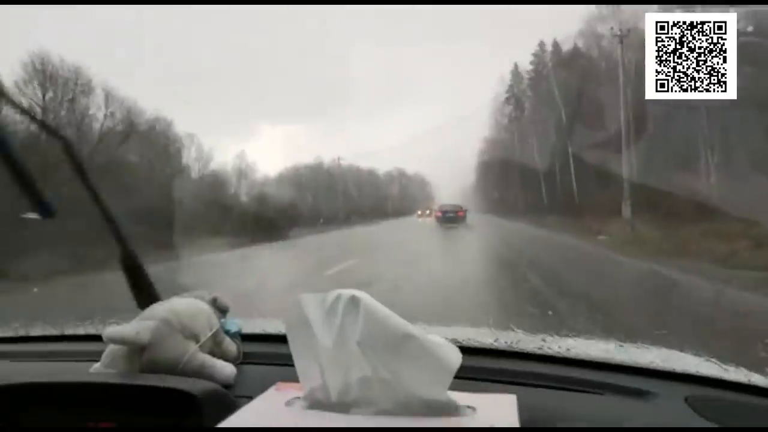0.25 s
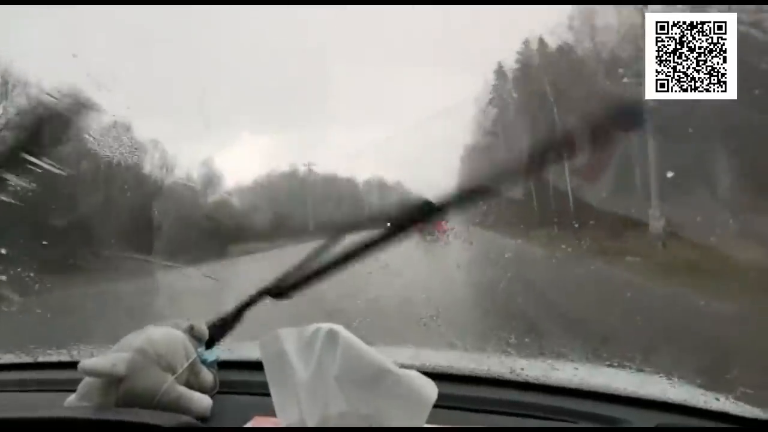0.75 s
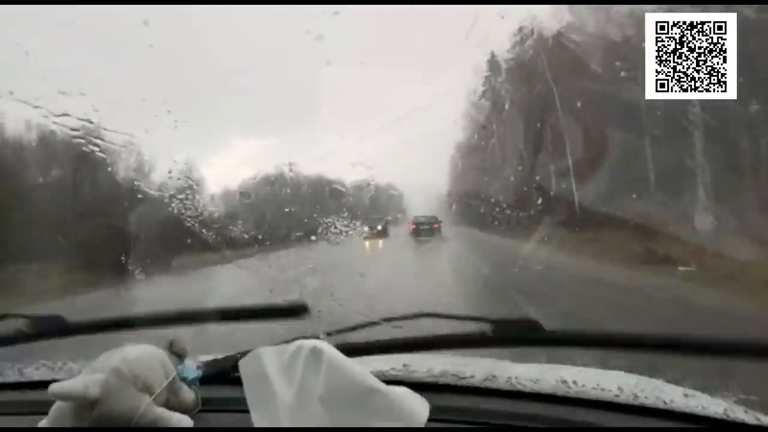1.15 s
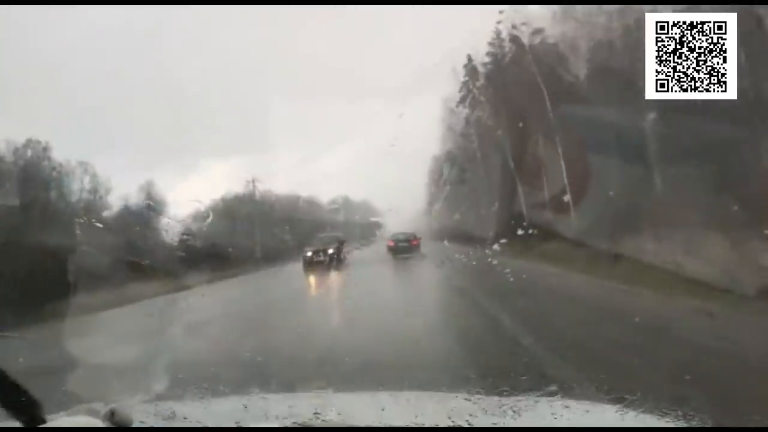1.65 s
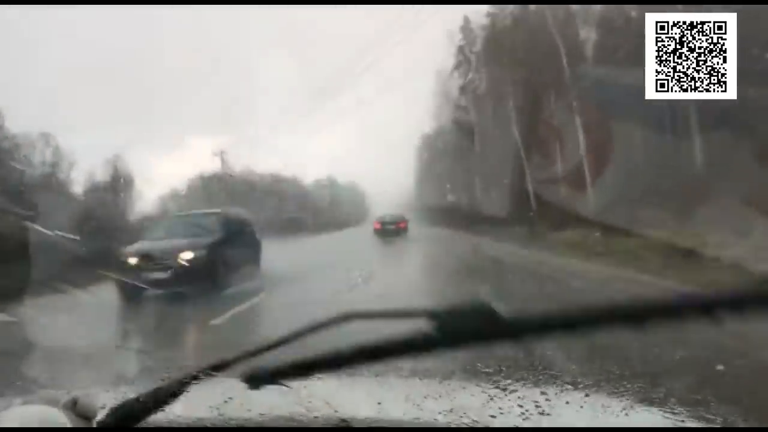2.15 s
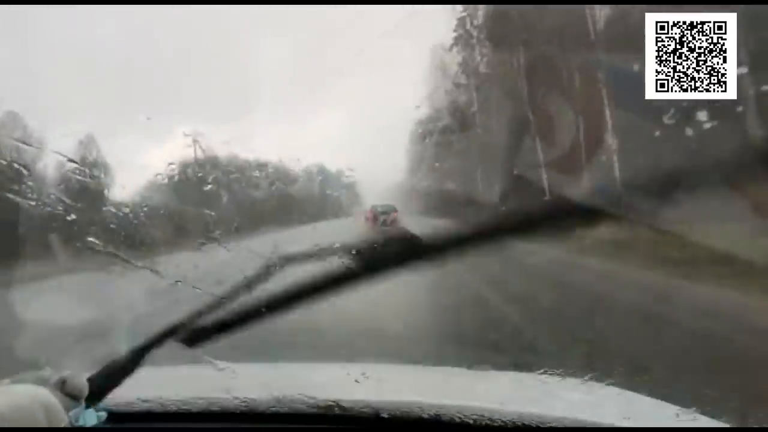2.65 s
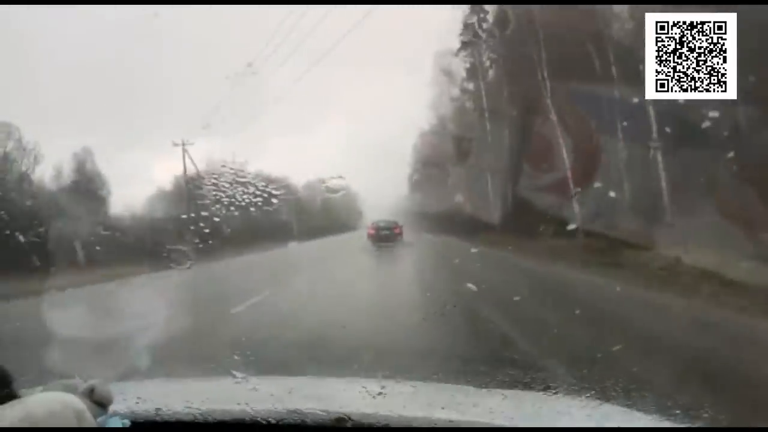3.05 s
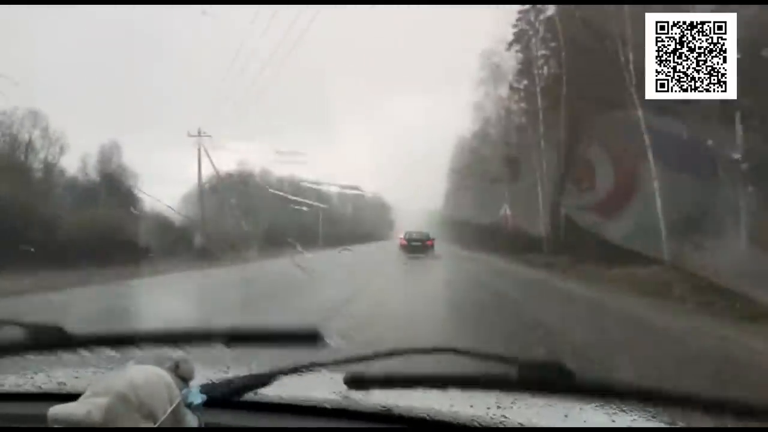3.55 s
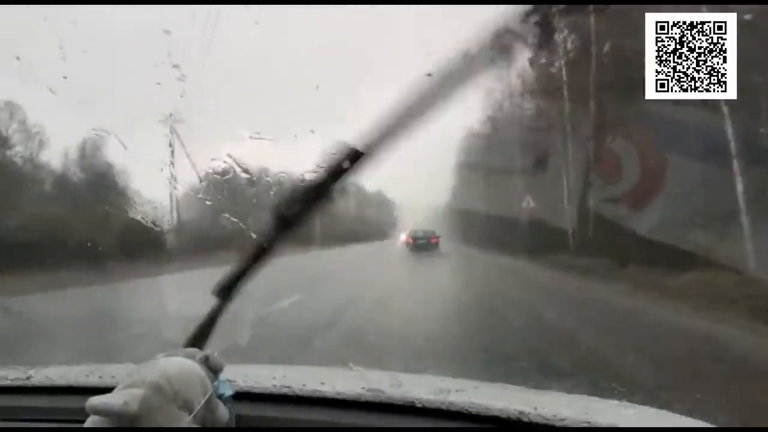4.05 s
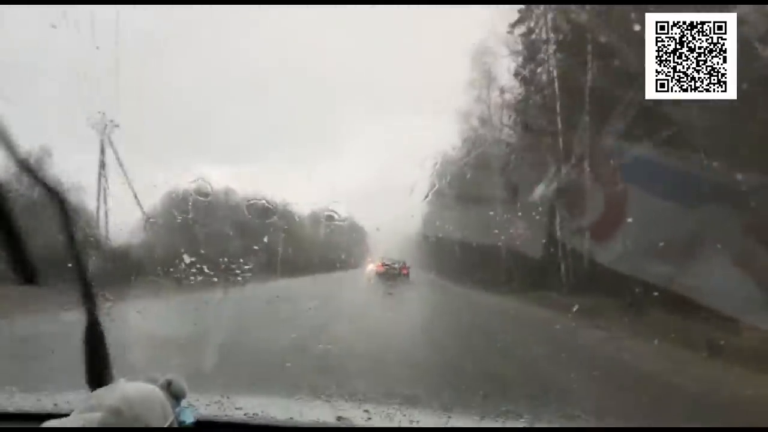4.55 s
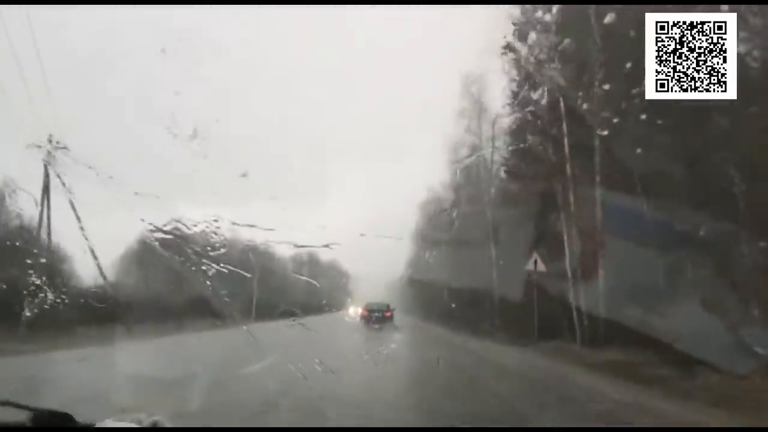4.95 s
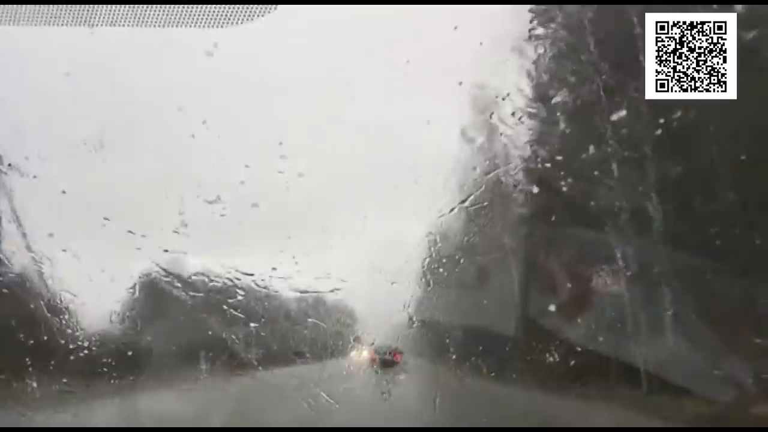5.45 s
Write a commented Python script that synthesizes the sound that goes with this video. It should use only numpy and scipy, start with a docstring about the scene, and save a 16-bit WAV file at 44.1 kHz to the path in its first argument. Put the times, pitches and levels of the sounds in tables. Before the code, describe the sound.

Inside a car on a wet road, hail and heavy rain drum without pause. Each hard stone gives a hollow panel knock and a sharp tick on the glass, scattered irregularly over finer pattering. Underneath are deep rumble, boomy cabin air, tyre roar and faint hums that sink as the car slows. Close stereo cabin pickup, treble muffled at the very top.

```python
"""Hail on a slowing car

Inside a car that slows on a wet road, heavy rain and hail drum on the roof and windscreen.
Every stone knocks the panels, ticks on the glass and rings briefly: random blows excite decaying noise.
Underneath, shaped noise makes the road rumble, the cabin boom and the tyre roar.
Sines tied to the falling road speed make the hums of engine, tyres and drive train."""
import sys
import numpy as np
from scipy import signal
from scipy.fft import rfft, irfft, next_fast_len
from scipy.io import wavfile
from scipy.ndimage import uniform_filter1d, map_coordinates

SR = 44100
rng = np.random.default_rng(int(sys.argv[2]) if len(sys.argv) > 2 else 0)


def log_audio(samples):
    """Write samples as a 16-bit WAV file to the path given in sys.argv[1]."""
    # one column per channel
    frames = np.atleast_2d(samples).T
    # limit to full scale, then quantise
    limited = np.clip(frames, -1, 1)
    pcm = np.round(limited * 32767).astype(np.int16)
    wavfile.write(sys.argv[1], SR, pcm)


N = 251811  # length in samples
TOP_HZ = 7900  # upper limit of the sound


def amp(db):
    """Decibels to gain."""
    return 10 ** (np.asarray(db) / 20)


def unit(x):
    """Scale x to rms 1."""
    return x / np.sqrt(np.mean(np.abs(x) ** 2) + 1e-20)


def along(points, hz):
    """Read (Hz, value) points on a logarithmic frequency axis."""
    point_hz, values = np.transpose(points)
    return np.interp(np.log(hz + 1), np.log(point_hz + 1), values)


def curve(points):
    """Draw (seconds, value) points as one value per sample."""
    seconds, values = np.transpose(points)
    return np.interp(np.arange(N) / SR, seconds, values)


def wobble(rate):
    """A smooth random curve with rate knots a second."""
    knots = rng.standard_normal(int(N * rate / SR) + 4)
    return map_coordinates(knots, [np.arange(N) * rate / SR])


def filtered(x, response):
    """Filter x by a response given as a function of frequency."""
    size = next_fast_len(N + SR // 2)
    spectrum = rfft(x, size)
    return irfft(spectrum * response(np.fft.rfftfreq(size, 1 / SR)), size)[..., :N]


def causal(gain):
    """The minimum-phase response with this gain: it rings only after the blow."""
    cepstrum = irfft(np.log(np.maximum(gain, 1e-6)))
    half = cepstrum.shape[-1] // 2
    fold = np.r_[1, np.full(half - 1, 2), np.zeros(half)]
    return np.exp(rfft(cepstrum * fold))


def stereo(pair, alike):
    """Blend two unrelated signals into left and right with a given coherence."""
    def mid_side_gains(hz):
        turn = np.arccos(np.clip(along(alike, hz), -1, 1)) / 2
        return np.array([np.cos(turn), np.sin(turn)])
    mid, side = filtered(pair, mid_side_gains)
    return np.array([mid + side, mid - side])


# Likeness of the road noise left and right. Each row: frequency in Hz, coherence from 0 to 1.
ROAD_ALIKE = [(50, 1), (150, 0.96), (300, 0.84), (600, 0.38), (2000, 0.18)]


def rumble(spectrum, evenness):
    """Cabin noise of rms 1; evenness steadies its swells."""
    noise = stereo(rng.standard_normal((2, N)), ROAD_ALIKE)
    noise = filtered(noise, lambda hz: amp(along(spectrum, hz) - 120 * (hz > TOP_HZ)))
    power = uniform_filter1d(np.mean(unit(noise) ** 2, axis=0), SR // 8)
    power = np.abs(power) + 1e-3
    return unit(noise / power ** (evenness / 2))


# Colour of body shake, cabin boom and tyre roar. Each row: frequency in Hz, relative level in dB.
SHAKE_COLOUR = [(8, -18), (17, -8), (25, -2.5), (33, -5.5), (42, -5), (52, -11), (65, -12.5), (100, -44),
                (400, -120)]
BOOM_COLOUR = [(35, -33), (55, 2.5), (75, -4), (95, -0.5), (120, 0.5), (145, -6.5), (170, -7), (260, -38.5),
               (1000, -120)]
ROAR_COLOUR = [(110, -25.5), (165, 1.5), (230, 0), (290, -3), (380, -5), (500, -9.5), (800, -27),
               (2000, -35), (7500, -58)]
# How hard the uneven road shakes the body. Each row: time in seconds, level in dB before a fixed trim.
BUMPS = [(0, -20), (.6, -24.5), (1, -20.5), (2.2, -20), (2.8, -20), (3.22, -13.5), (3.4, -20.5), (3.6, -17),
         (4.1, -22), (4.37, -26), (4.65, -18.5), (4.9, -21.5), (5.6, -17.5)]
# Road speed as the pitch of the tyre drone, also played by the hums. Each row: time in seconds, pitch in Hz.
SPEED = [(0, 86.7), (.8, 87.1), (1.6, 85.94), (2.2, 81.5), (2.8, 77.2), (3.7, 73.96), (4.35, 72.08),
         (5.0, 71.45), (5.71, 69.86)]
# Levels at the starting speed, before the stereo lean, and their growth with speed
BOOM_DB, BOOM_DB_PER_OCTAVE = -24, 3.5
ROAR_DB, ROAR_DB_PER_OCTAVE = -27.5, 9.5


def road():
    """The road shakes the body, booms in the cabin and roars under the tyres; the last two follow speed."""
    speed = curve(SPEED)
    octaves = np.log2(speed / speed[0])
    boom_db = BOOM_DB + BOOM_DB_PER_OCTAVE * octaves
    roar_db = ROAR_DB + ROAR_DB_PER_OCTAVE * octaves
    shake = amp(curve(BUMPS) + 1.6) * rumble(SHAKE_COLOUR, evenness=0.67)
    boom = amp(boom_db) * rumble(BOOM_COLOUR, evenness=0.64)
    roar = amp(roar_db) * rumble(ROAR_COLOUR, evenness=0.24)
    return shake + boom + roar


# Hums of engine, tyres and drive train that swell, hold and fade.
# Each row: multiple of the tyre drone, hold start in seconds, hold end in seconds,
# level in dB before waver and stereo lean, slope of swell and fade in dB per second.
HUMS = [(.77, 4.27, 5.71, -18, 63), (.75, 2.48, 2.62, -18, 72), (1, 0.61, 2.2, -29.5, 7.5),
        (1, 2.75, 3.74, -26.5, 19.5), (1, 4.4, 5.2, -27.5, 31.5), (1.372, 3.95, 6.9, -29, 10.5),
        (1.485, 0.21, 0.4, -25.5, 47), (1.468, 1.4, 1.55, -25, 48), (1.96, 0.52, 1.1, -32.5, 22),
        (2.3, 4.7, 6.5, -35, 24), (2.8, 1.76, 2.4, -32.5, 41.5), (2.87, 3.1, 3, -37.5, 4.5),
        (2.15, 2.5, 2.9, -30, 32.5), (5.3, 4.7, 5.7, -43, 31)]


def hums(waver_db, slip_rad):
    """Turning parts hum in step with the road speed, unsteady in level and phase."""
    t = np.arange(N) / SR
    drone_phase = 2 * np.pi * np.cumsum(curve(SPEED)) / SR
    out = np.zeros(N)
    for multiple, start, end, db, slope in HUMS:
        swell_db = -slope * np.abs(t - np.clip(t, start, end))
        level = amp(db + swell_db + waver_db * wobble(11.0))
        phase = multiple * drone_phase + slip_rad * wobble(5.4)
        out += level * np.sqrt(2) * np.sin(phase)
    return out


# Ring of the panels and the cabin. Each row: frequency in Hz, time to fall 60 dB in seconds.
CABIN = [(300, 0.34), (800, 0.18), (2000, 0.093), (7000, 0.075)]
# Likeness of the impacts left and right. Each row: frequency in Hz, coherence from 0 to 1.
PANEL_ALIKE = [(250, 0.92), (550, 1), (1200, 0.2), (1700, 0.31), (3500, 0.051), (7000, 0.046)]


def strikes(s, db, snap_db, swell_s, colour_db, scatter, count=26):
    """Blows land on random spots, each with its own snap and a ring that swells as the waves spread."""
    t = np.arange(SR // 7) / SR
    spots = rng.integers(count, size=len(s))
    at = np.clip(np.round(s * SR).astype(int), 0, N - 1)
    # the ring: noise with its own colour at each spot, fading at its own pace in each band
    hz, age, bands = signal.stft(rng.standard_normal((count, 2, len(t))), SR, nperseg=128)
    uneven = uniform_filter1d(rng.standard_normal((count, 1, len(hz), 1)), 2, axis=2)
    colour = amp(colour_db * unit(uneven))
    fade = amp(-60 * age / along(CABIN, hz)[:, None])
    ring = signal.istft(bands * colour * fade, SR, nperseg=128)[1][..., :len(t)]
    # echoes from glass and trim arrive in uneven clumps
    density = uniform_filter1d(rng.standard_normal((count, 1, len(t))), size=130, axis=2)
    clumps = np.exp(scatter * unit(density))
    answers = ring * clumps * (1 - np.exp(-t / swell_s))
    answers[..., 0] += amp(snap_db) * rng.standard_normal((count, 2))
    out = np.zeros((2, N))
    for spot, answer in enumerate(answers):
        here = spots == spot
        strength = np.sqrt(np.mean(answer[:, t < .012] ** 2))  # levelled over the first 12 ms
        blows = np.bincount(at[here], amp(db[here]), N)
        out += signal.oaconvolve(blows[None], answer / strength, axes=1)[:, :N]
    return stereo(out, PANEL_ALIKE)


# What roof and windscreen radiate. Each row: frequency in Hz, relative left level in dB, relative right in dB.
PANEL = [(387, -4.5, -5), (462, -12, -12.5), (560, -8, -12), (630, -12.5, -7), (750, -8, -8.5),
         (784, -4, -6.5), (930, -5, -6.5), (1200, -4, -7.5), (1360, -2, -9), (2014, -0.2, -10.5),
         (2534, -9, -18.5), (3550, -14.5, -24.5), (4670, -34.5, -28), (5600, -31.5, -28), (6590, -32, -25),
         (7490, -26.5, -14.5)]


def radiate(x, low_hz, high_hz, steep):
    """One band of the panels' sound at the two microphones, with an rms gain of 1 over all frequencies."""
    def response(hz):
        panel_hz, left, right = np.transpose(PANEL)
        colour = amp([along(np.c_[panel_hz, left], hz), along(np.c_[panel_hz, right], hz)])
        low_cut = 1 + (low_hz / (hz + 1)) ** steep
        high_cut = 1 + (hz / high_hz) ** 24
        band = 1 / np.sqrt(low_cut * high_cut)
        delay = np.array([[13], [0]]) / SR  # left hears the panels 13 samples late
        return causal(unit(colour * band)) * np.exp(-2j * np.pi * hz * delay)
    return filtered(x, response)


PATH_SPREAD_S = .0004  # scatter of a crack's arrival at the microphones


def cracks(stones, t60, gain_db, growth, splash_db):
    """Windscreen blows also reach the microphones directly: a dry click and a splash fading over t60 seconds."""
    t = np.arange(SR // 100) / SR
    s, knock_db, tick_db = np.transpose(stones)
    # the crack grows faster than the tick, and most where the stone misses the panels
    db = tick_db + growth * np.clip(tick_db - knock_db + 4.5, -12, 8) + gain_db
    bursts = rng.standard_normal((len(s), 2, len(t))) * amp(-60 * t / t60)
    bursts *= amp(splash_db) / np.linalg.norm(bursts, axis=2, keepdims=True)
    bursts[..., 0] = 1  # the click
    bursts *= (amp(db) / np.linalg.norm(bursts, axis=(1, 2)))[:, None, None]
    # each stone lands elsewhere on the glass, so its paths to the two microphones differ
    arrival = s[:, None] + PATH_SPREAD_S * rng.uniform(0, 1, (len(s), 2))
    first = np.maximum(np.round(arrival * SR).astype(int), 0)
    at = first[..., None] + np.arange(len(t))
    pair = [np.bincount(at[:, ear].ravel(), bursts[:, ear].ravel(), N)[:N] for ear in range(2)]
    return radiate(np.array(pair), low_hz=3520, high_hz=8900, steep=4.7)


# Strength of the downpour. Each row: time in seconds, level in dB before the offsets of each kind of blow.
RAIN = [(0, -40.5), (.165, -47.5), (.19, -28.5), (.36, -30), (.44, -32), (.51, -29.5), (.59, -21.5),
        (.78, -29.5), (.95, -21.5), (1.15, -25), (1.38, -29.5), (1.48, -24.5), (1.58, -32.5), (1.66, -25.5),
        (1.87, -25.5), (2.04, -26.5), (2.28, -30.5), (2.34, -28), (2.54, -26.5), (2.6, -30), (2.71, -26.5),
        (2.755, -35), (2.81, -30.5), (2.9, -40.5), (2.99, -25), (3.045, -36.5), (3.12, -26), (3.55, -29),
        (3.8, -25.5), (3.9, -31.5), (3.97, -27.5), (4.4, -27.5), (4.51, -25.5), (4.555, -29), (4.6, -26),
        (4.75, -25), (4.85, -27.5), (5.1, -26.5), (5.3, -29.5), (5.4, -25), (5.46, -25), (5.7, -26.5)]
KNOCK_TOP_DB, TICK_TOP_DB = -28.5, -36  # the most that a small stone or a drop can reach


def shower(count, knock_db, tick_db, spread_db, hardness_db):
    """Random blows (s, knock dB, tick dB) sized by the downpour; icy ones tick harder than soft ones."""
    # one blow per equal slot, jittered over two slots and wrapped around
    slots = (np.arange(count) + rng.uniform(0, 2, count)) % count
    s = slots / count * N / SR
    size, hardness = np.clip(rng.standard_normal((2, count)), -1.7, 1.7)
    db = np.interp(s, *np.transpose(RAIN)) + spread_db * size
    knock = np.minimum(db + knock_db, KNOCK_TOP_DB)
    tick = np.minimum(db + tick_db + hardness_db * hardness, TICK_TOP_DB)
    return np.c_[s, knock, tick]


def spray(count, start_s, length_s, knock_db, tick_db, spread_db):
    """An oncoming car throws a short volley of soft drops on the windscreen: (s, knock dB, tick dB)."""
    s = start_s + length_s * rng.uniform(0, 1, count)
    db = knock_db + spread_db * rng.standard_normal(count)
    return np.c_[s, db, db + tick_db]  # tick_db is relative to the knock


# The hard hailstones, placed one by one. Each row: start in seconds, panel knock in dB, glass tick in dB.
HAIL = [(.004, -27, -36.5), (.078, -28, -40), (.1, -30.5, -37), (.17, -24.5, -35.5), (.203, -22.5, -33.5),
        (.276, -23.5, -34), (.382, -26.5, -35.5), (.402, -27, -29), (.44, -24.5, -40.5), (.449, -24.5, -39),
        (.458, -30.5, -30.5), (.529, -28.5, -29), (.575, -20.5, -39), (.62, -25.5, -30.5),
        (.634, -24, -39.5), (.701, -31, -30.5), (.717, -23, -28), (.788, -24.5, -28), (.831, -28, -30),
        (.855, -22, -38), (.933, -24, -33), (1.04, -22.5, -30), (1.093, -22.5, -26.5), (1.127, -20.5, -31),
        (1.189, -24.5, -35), (1.232, -24.5, -34.5), (1.308, -25.5, -36), (1.358, -34, -42.5),
        (1.416, -22, -34), (1.479, -29, -41), (1.595, -26, -37), (1.608, -22, -30), (1.724, -26, -37),
        (1.747, -27, -33.5), (1.782, -21.5, -38), (1.835, -28, -29), (1.863, -21.5, -28),
        (1.96, -21.5, -35.5), (2.0, -26, -30.5), (2.044, -24, -33.5), (2.149, -30, -32),
        (2.258, -28.5, -35), (2.294, -25, -30), (2.312, -18, -35), (2.356, -31, -31), (2.38, -24.5, -30),
        (2.413, -27.5, -28.5), (2.435, -20.5, -35.5), (2.566, -29, -29.5), (2.604, -34, -33.5),
        (2.631, -20.5, -36), (2.655, -26, -31.5), (2.666, -24, -38), (2.765, -31, -34), (2.78, -22.5, -32),
        (2.813, -28.5, -30), (2.835, -23.5, -33), (2.882, -28, -34.5), (2.929, -28, -30),
        (2.972, -24, -32.5), (3.012, -27, -30), (3.073, -25.5, -34), (3.131, -28, -30), (3.158, -24, -29),
        (3.193, -33, -37), (3.245, -26.5, -30), (3.275, -33, -33.5), (3.298, -26.5, -27),
        (3.352, -37, -34.5), (3.389, -29, -43), (3.405, -21.5, -28), (3.455, -25.5, -31),
        (3.492, -26, -35.5), (3.6, -23, -37), (3.638, -23.5, -32.5), (3.754, -28, -38), (3.891, -32, -34.5),
        (3.925, -29.5, -35.5), (3.958, -27.5, -30), (3.988, -27.5, -43), (4.033, -26.5, -30.5),
        (4.082, -27.5, -32.5), (4.133, -28.5, -31), (4.218, -23, -44), (4.256, -30, -30.5),
        (4.305, -23, -31.5), (4.345, -34.5, -30.5), (4.381, -27.5, -43), (4.45, -28, -35),
        (4.468, -28, -31), (4.563, -31.5, -37.5), (4.578, -23.5, -28.5), (4.611, -25, -30),
        (4.651, -28.5, -34), (4.678, -28.5, -41), (4.693, -27.5, -31), (4.786, -28, -32.5),
        (4.892, -27, -28.5), (4.926, -23.5, -32.5), (4.988, -28, -32.5), (5.152, -26.5, -30.5),
        (5.18, -34, -34), (5.213, -26, -34.5), (5.272, -32.5, -34.5), (5.327, -27.5, -34),
        (5.361, -35.5, -32.5), (5.44, -24, -35.5), (5.52, -26, -32.5), (5.601, -26, -30.5)]
# Dull drumming of the roof against the brighter rest of the knocks. Each row: time in seconds, balance in dB.
ROOF = [(0, 0.5), (1, 1), (2.4, -1.5), (3.4, 1.5), (4.6, 3.5), (5.7, 4)]


def downpour():
    """Hard stones, small hail, big drops, fine rain and spray knock the panels and tick on the glass."""
    pellets = shower(count=150, knock_db=-3.5, tick_db=-9.5, spread_db=4.0, hardness_db=2.0)
    drops = shower(count=520, knock_db=-5.5, tick_db=-14.0, spread_db=3.5, hardness_db=3.0)
    fine = shower(count=3500, knock_db=-16, tick_db=-26.0, spread_db=5.5, hardness_db=0.5)
    volley = spray(count=40, start_s=2.3, length_s=.25, knock_db=-36, tick_db=-6.5, spread_db=1.5)
    s, knock_db, tick_db = np.vstack([HAIL, pellets, drops, fine, volley]).T
    knocks = strikes(s, knock_db, snap_db=5.0, swell_s=0.0018, colour_db=2.5, scatter=0.29)
    ticks = strikes(s, tick_db, snap_db=16.5, swell_s=0.00089, colour_db=3.0, scatter=0.39)
    body = radiate(knocks, low_hz=306, high_hz=4030, steep=8.27)
    # the lined roof gives the low part of each knock
    roof = filtered(body, lambda hz: 1 / (1 + (hz / 1150) ** 4))
    bright = body - roof
    balance_db = curve(ROOF)
    glass = radiate(ticks, low_hz=3840, high_hz=7010, steep=8.75)
    glass += cracks(HAIL, t60=0.004, gain_db=26.5, growth=0.7, splash_db=-5)
    glass += cracks(pellets, t60=0.0051, gain_db=24.0, growth=0.45, splash_db=3.5)
    glass += cracks(drops, t60=0.0018, gain_db=25.0, growth=0.4, splash_db=-6.5)
    return amp(balance_db / 2) * roof + amp(-balance_db / 2) * bright + glass


def scene():
    """The downpour over the sounds of driving, which lean slightly left."""
    lean = amp([[.45], [-.45]])  # left and right, dB
    rain_and_hail = downpour()
    driving = road() + hums(waver_db=0.7, slip_rad=.1)
    return rain_and_hail + driving * lean


def record(dry):
    """Round the highest peaks, then roll the treble off steeply around the upper limit."""
    rounded = dry / (1 + np.abs(dry / .85) ** 8) ** (1 / 8)
    edge = [(TOP_HZ - 300, 0), (TOP_HZ, -10), (TOP_HZ + 400, -31),
            (TOP_HZ + 1400, -45), (TOP_HZ + 3500, -85)]  # Hz, dB
    return filtered(rounded, lambda hz: amp(along(edge, hz)))


dry = scene()
out = record(dry)
log_audio(out)
```